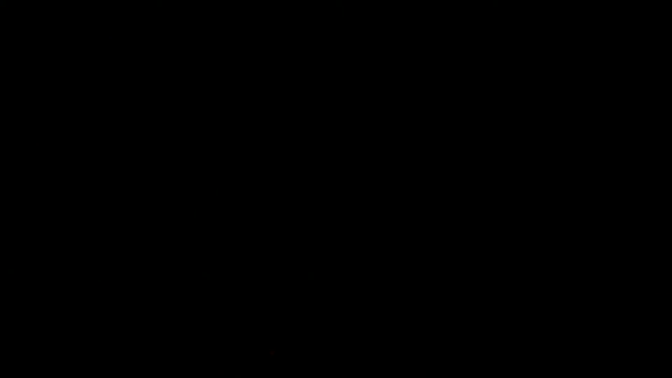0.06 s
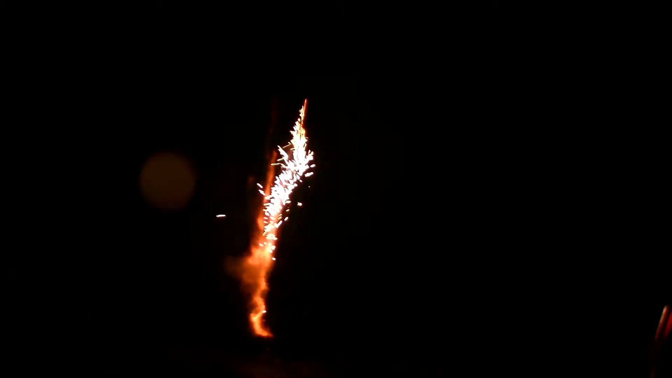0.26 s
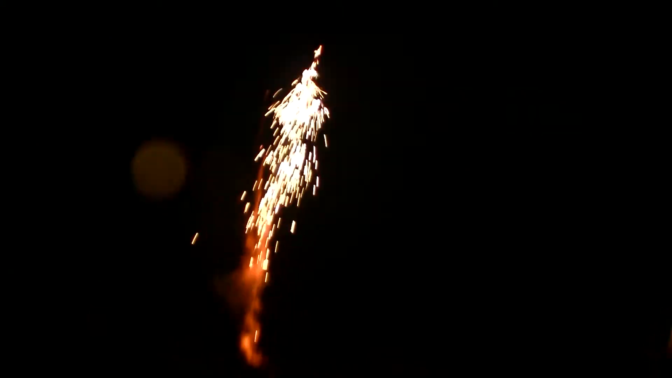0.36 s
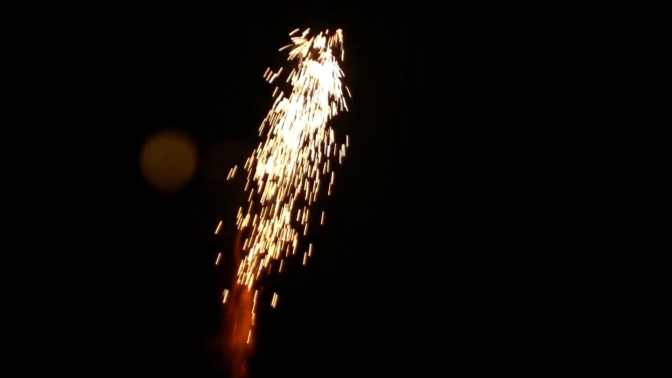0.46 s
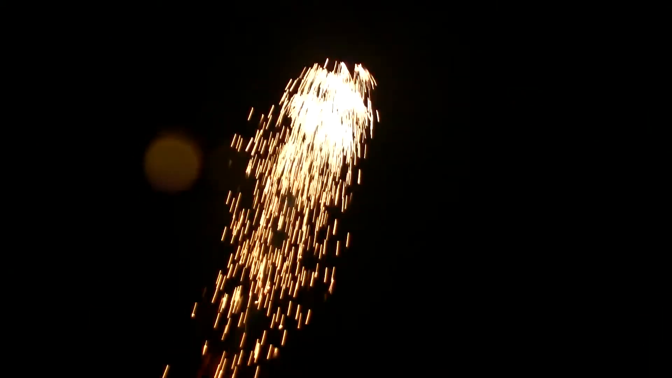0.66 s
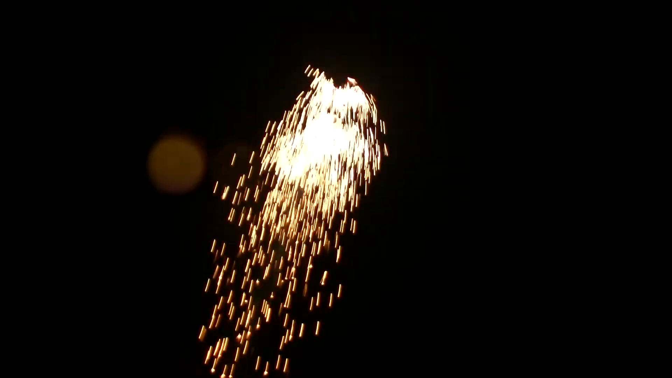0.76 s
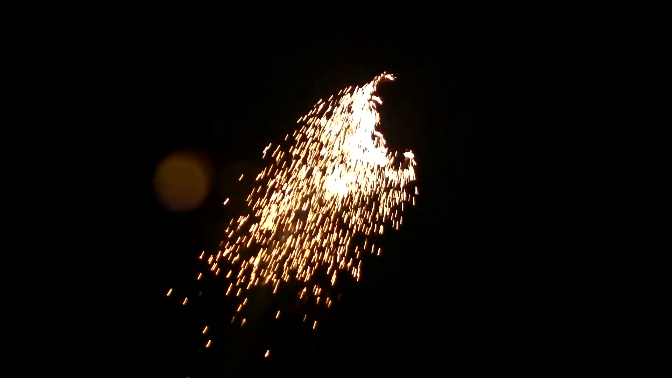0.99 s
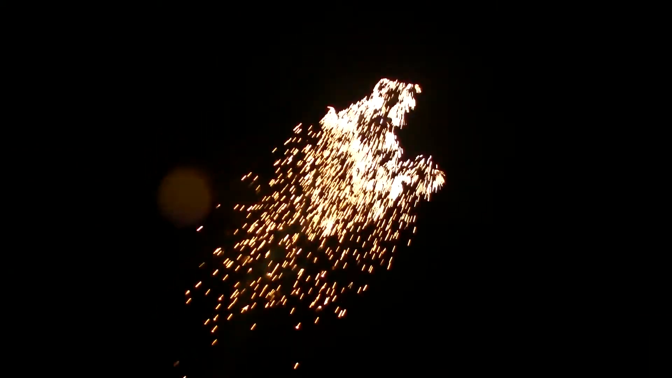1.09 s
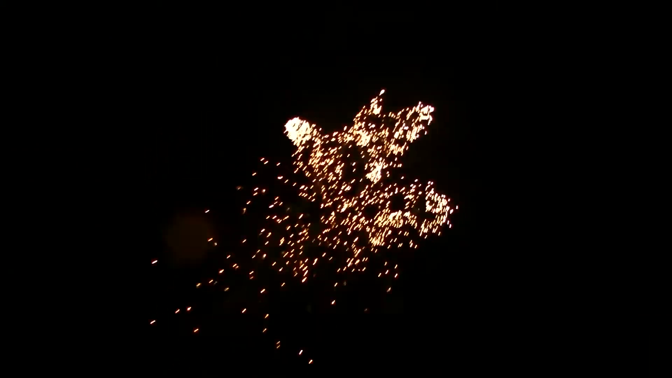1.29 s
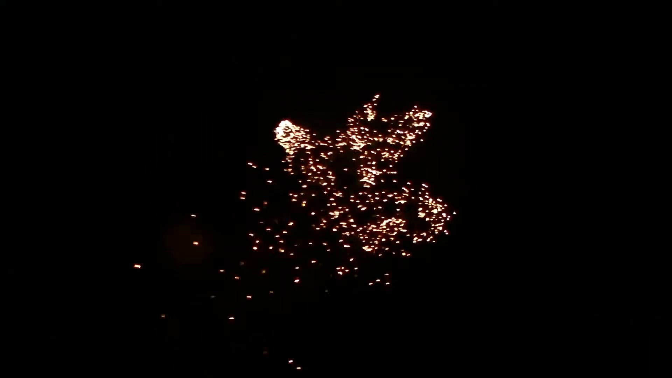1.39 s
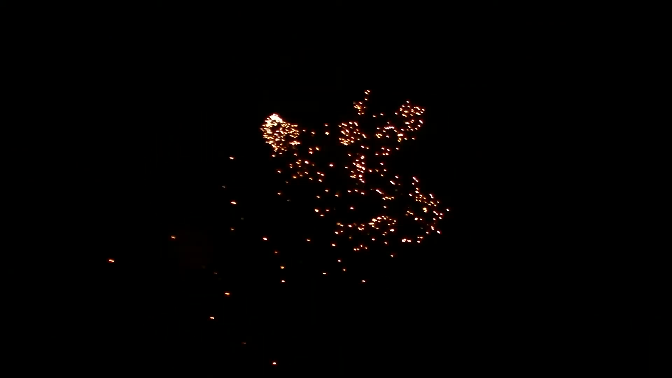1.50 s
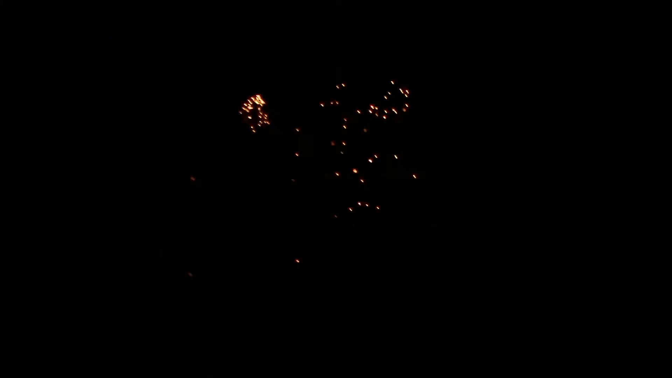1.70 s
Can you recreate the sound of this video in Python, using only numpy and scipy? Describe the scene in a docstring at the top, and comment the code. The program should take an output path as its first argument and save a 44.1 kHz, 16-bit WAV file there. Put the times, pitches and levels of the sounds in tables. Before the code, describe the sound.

A firework tube pops sharply, then three screeching whistlers fall in pitch and finally lift

```python
"""The low tail of an earlier shot dies away over faint hiss; a firework tube spits flame and pops, overloaded.
Three whistlers leave it at once: burning pipes, each a sine with overtones, falling in pitch as they burn.
At first they sputter in irregular shocks, a rasping screech whose ground echo lags more as they climb.
Their pitch lifts as they die; the rasp stops, and the last one alone goes on in a steadier tone.
Faint scattered echoes follow every sound of the new shot and the whistlers."""
import sys
import numpy as np
from scipy import signal
from scipy.fft import rfft, irfft, next_fast_len
from scipy.io import wavfile
from scipy.ndimage import uniform_filter1d, minimum_filter1d, map_coordinates

SR = 44100
rng = np.random.default_rng(int(sys.argv[2]) if len(sys.argv) > 2 else 0)


def to_wav(s):
    """Save 16-bit WAV."""
    ch = np.atleast_2d(s).T  # columns
    pcm = np.round(np.clip(ch, -1, 1) * 32767)  # PCM
    wavfile.write(sys.argv[1], SR, pcm.astype(np.int16))


N = 74970
T = np.arange(N) / SR  # s

# Spectrum of the earlier shot's low tail and the faint hiss: f/Hz, relative level/dB
TAIL_AND_HISS_SHAPE = [(25, 10), (90, 1), (250, -3.5), (450, -6.5), (900, -13.5), (2500, -15),
                       (3300, -26.5), (8000, -28.5), (16000, -38.5)]
# Loudness of that dying tail and hiss: t/s, level/dB
TAIL_AND_HISS_LEVEL = [(0, -33.5), (.03, -36.5), (.19, -34.5), (.4, -51), (1.0, -49), (1.7, -55)]

# Decay of the scattered echoes: f/Hz, t60/s
SCATTER_T60 = [(100, 0.13), (400, 0.84), (1000, 1), (2500, 0.99), (6000, 1), (14000, 0.51)]
SCATTER_DB, SCATTER_DELAY_S = -18.5, 0.025

# Resonances of the tube's boom: f/Hz, level/dB, t60/s
TUBE_MODES = [(105, -8, 0.055), (199, 0.5, 0.0378), (254, -13.5, 0.12), (397, 2.5, 0.026),
              (550, -29, 0.0083), (1210, -8, 0.041)]
# Spectrum of the flame and gas noise: f/Hz, relative level/dB
GAS_SHAPE = [(100, -28), (600, 2), (2000, 0.5), (4000, -0.5), (7000, -6.5), (11000, -25), (16000, -42)]
SPIT_S, SPIT_DB, POP_S = .2054, -14, .2101
BLAST_S, BLAST_DB = 0.0016, 9.5
CRACK_DELAY_S, CRACK_DB, CRACK_T60_S = 0.00037, 2, 0.0051
GAS_DB, GAS_T60_S = -8, 0.068

# Pitch and tone of each whistler: t/s, f/Hz, level of the fundamental before choking/dB
FIRST_WHISTLER = [(0.247, 3846, -10), (.257, 3778, -11), (.283, 3649, -16), (.315, 3529, -32),
                  (.338, 3445, -21), (0.419, 3321, -22), (.49, 3045, -32), (.57, 2823, -19),
                  (.68, 2741, -36), (.83, 2599, -21), (.92, 2411, -51), (1.049, 2313, -23),
                  (1.12, 2165, -32), (1.215, 2061, -9.5), (1.237, 2178, -29), (1.255, 2242, -17),
                  (1.31, 2152, -20), (1.36, 2255, -36), (1.39, 2464, -27), (1.415, 2574, -31.5),
                  (1.439, 2744, -42)]
SECOND_WHISTLER = [(.27, 3881, -27), (.31, 3596, -32), (0.334, 3533, -17), (.385, 3530, -22.5),
                   (.47, 3146, -23), (.62, 3058, -40), (.72, 3002, -23.5), (.92, 2483, -31),
                   (1.05, 2154, -18), (1.2, 2199, -30), (1.33, 2305, -25.5), (1.38, 2516, -29)]
LAST_WHISTLER = [(.262, 4042, -20), (.30, 3544, -18.5), (.35, 3324, -15.5), (0.431, 2954, -20.5),
                 (.55, 2817, -22.5), (0.769, 2455, -35), (.9, 2317, -29), (.98, 2044, -21.5),
                 (1.16, 1987, -22.5), (1.25, 2158, -20), (1.34, 2087, -20.5), (1.38, 1969, -28),
                 (1.42, 1917, -28), (1.45, 1961, -36.5), (1.476, 1970, -25), (1.495, 1996, -30),
                 (1.516, 2055, -25), (1.54, 2216, -33.5), (1.569, 2163, -29.5), (1.625, 2372, -31),
                 (1.663, 2700, -41), (1.681, 2540, -41.5)]
# Roughness of the burn, shared by all three: t/s, roughness (0 steady, about 1 rough)
ROUGHNESS = [(.25, 0.89), (.34, 0.79), (.45, 1.06), (.9, 1.02), (1.15, .7), (1.34, 0.59), (1.41, 0.16),
             (1.5, 0.12), (1.7, 0.11)]
# Whole overtones: multiple of the pitch, base level/dB
OVERTONES = [(2, -16), (3, -27), (4, -40), (5, -51.5)]
# Half tones, heard when every other cycle is weak: multiple of the pitch, base level/dB
HALF_TONES = [(.5, -5.5), (1.5, -8.5), (2.5, -17.5), (3.5, -32), (4.5, -36)]
# Timbre offsets: t/s, second overtone level/dB (grows with the multiple), half tone level/dB
TIMBRE = [(.25, -16, -27), (1.05, -10, -13), (1.22, 4, -0.5), (1.3, 2.5, -4.5), (1.36, -2, -11),
          (1.42, 0, 2), (1.465, 10.5, 1.5), (1.495, -11, -8.5), (1.515, 5, -10.5), (1.54, -1.5, -10),
          (1.565, 6, -14), (1.60, -2.5, -32), (1.645, -7, -49)]
# Extra half tone level of the first, second and last whistler: level/dB
HALF_TONE_LEAN = [-6.5, 1.5, 0]
PARTIAL_SWING_DB, PARTIAL_SWING_RATE = 3, 49.77  # the rate in knots/s
ROUGH_WAVER, ROUGH_WAVER_RATE = .035, 330  # pitch scatter (share) at roughness 1, knots/s
FINE_WAVER, FINE_WAVER_RATE = .006, 900  # tremble of even a steady burn: pitch scatter (share), knots/s
CHOKE_PER_ROUGHNESS, CHOKE_MAX, CHOKE_RATE = 1.72, .9, 170  # tone lost (share), its cap, knots/s

# Loudness of the rasp before its trims: t/s, body level/dB, treble level/dB
RASP_LEVEL = [(0.25, -34, -35), (0.272, -13.5, -19), (0.322, -21, -35.5), (0.35, -18, -26),
              (0.404, -12, -21.5), (0.49, -16.5, -25), (0.498, -22, -32), (0.53, -13, -24.5),
              (0.618, -18.5, -31), (0.644, -10.5, -23), (0.672, -18.5, -31.5), (0.72, -11, -25.5),
              (0.736, -14, -30.5), (0.792, -13, -26), (0.846, -11, -31.5), (0.852, -14, -31.5),
              (0.894, -12.5, -25.5), (0.96, -11.5, -32.5), (0.97, -12.5, -26), (1.172, -16.5, -37.5),
              (1.21, -17, -38), (1.234, -20, -46), (1.27, -22.5, -40), (1.276, -20.5, -50),
              (1.314, -19.5, -35), (1.336, -19, -46), (1.364, -20.5, -41), (1.385, -27, -68)]
BODY_TRIM_DB, TREBLE_TRIM_DB = -1, 2.5
# Spectra of the rasp's body, treble and low end: f/Hz, relative level/dB
RASP_BODY = [(60, -51), (150, -35), (260, -31.5), (500, -7), (1000, -2.5), (2000, -0.5), (3000, -0.5),
             (4200, -0.5), (6000, -21.5), (7500, -17.5), (11000, -59.5)]
RASP_TREBLE = [(2000, -68.5), (4500, -2.5), (6300, 2.5), (8000, -6), (10000, -14), (13000, -23),
               (16000, -32)]
RASP_THUD = [(50, -22), (120, -14), (200, -1), (330, 5), (520, -1.5), (800, -27), (2000, -46)]
# Loudness of the rasp's low end: t/s, level/dB
THUD_LEVEL = [(.27, -42), (.33, -31.5), (.40, -34), (.5, -35.5), (.65, -31.5), (.78, -32), (.95, -33.5),
              (1.1, -40), (1.3, -43.5), (1.385, -44.5)]
RASP_START_S, RASP_RISE_S, BURNOUT_DB_PER_S = 0.2543, 0.03, 177
SHOCK_CYCLES, SHOCK_CYCLES_SCATTER = 4, 1.1  # pipe cycles between shocks, before rounding
SHOCK_JITTER_CYCLES, SHOCK_SIZE_SPREAD = .3, 0.49  # further scatter at roughness 1, size spread (share)
RING_CYCLES, RING_SHARE = 0.82, 0.092  # the pipe's ring: cycles to fall to 1/e, level beside the shock
ECHO_START_S, CLIMB_S, ECHO_DELAY_S, ECHO_SHARE = .19, .41, .006, 0.24  # the lag grows towards .006 s

LOW_CUT_HZ, LIMIT, LIMIT_S = 90, 1, 0.00051
TOP_HZ, TOP_EDGE_HZ = 15900, 500  # middle and width of the treble cutoff


def amp(db):
    """Decibels to amplitude."""
    return 10 ** (np.asarray(db) / 20)


def unit(x):
    """x scaled to rms 1."""
    return x / np.sqrt(np.mean(x ** 2) + 1e-20)


def along(points, hz):
    """Reads (f/Hz, value) points on a log frequency axis."""
    f, v = np.transpose(points)
    return np.interp(np.log(hz + 1), np.log(f + 1), v)


def curves(rows):
    """One value per sample for each column after the time."""
    s, *columns = np.transpose(rows)
    return [np.interp(T, s, column) for column in columns]


def wobble(rate):
    """A smooth random curve, rate knots a second."""
    return map_coordinates(rng.standard_normal(4096), [T * rate], mode="wrap")


def coloured(x, points):
    """x through a causal, minimum-phase filter of unit energy with the given spectrum."""
    size = 4096
    magnitude = amp(along(points, np.fft.rfftfreq(size, 1 / SR)))
    cepstrum = irfft(np.log(magnitude))
    # folding the cepstrum forward makes the filter causal
    cepstrum[1:size // 2] *= 2
    cepstrum[size // 2 + 1:] = 0
    response = irfft(np.exp(rfft(cepstrum)))
    return signal.fftconvolve(x, response / np.linalg.norm(response))[:N]


def noise(points):
    """Coloured noise of rms 1."""
    return unit(coloured(rng.standard_normal(N), points))


def tail_and_hiss():
    """The dying low tail of an earlier shot over faint background hiss: one shaped noise."""
    level_db, = curves(TAIL_AND_HISS_LEVEL)
    return amp(level_db) * noise(TAIL_AND_HISS_SHAPE)


def surroundings(x):
    """Scattered echoes of the open ground: a noise tail whose decay depends on frequency."""
    hz, t, grains = signal.stft(rng.standard_normal(SR), SR, nperseg=256)
    decay = amp(-60 * t / along(SCATTER_T60, hz)[:, None])
    tail = signal.istft(grains * decay, SR, nperseg=256)[1]
    echoes = signal.fftconvolve(x, tail / np.linalg.norm(tail))[:N]
    return np.interp(T - SCATTER_DELAY_S, T, echoes)


def shot():
    """Flame spits, then the lift charge sends a blast wave, crack, tube boom and gas; the mic overloads."""
    t, fired = np.maximum(T - POP_S, 0), T >= POP_S
    spit = amp(SPIT_DB) * ((T >= SPIT_S) & ~fired)
    # the blast pressure jumps, then swings below zero before it settles
    blast = amp(BLAST_DB) * (1 - t / BLAST_S) * np.exp(-t / BLAST_S)
    boom = sum(amp(db - 60 * t / t60) * np.cos(2 * np.pi * hz * t) for hz, db, t60 in TUBE_MODES)
    onset = 1 - np.exp(-t / 0.000067)
    crack_level = amp(CRACK_DB - 60 * np.abs(t - CRACK_DELAY_S) / CRACK_T60_S)
    crack = (t > CRACK_DELAY_S) * crack_level * rng.standard_normal(N)
    puff = fired * amp(GAS_DB - 60 * t / GAS_T60_S)
    gas = (spit + puff) * noise(GAS_SHAPE)
    # both pressure terms enter with their sign flipped
    return np.clip(gas + crack - (blast + boom) * onset, -1, 1)


def ground_echo(x):
    """Adds a ground reflection, which falls behind as the source climbs."""
    climb = 1 - np.exp(-np.maximum(T - ECHO_START_S, 0) / CLIMB_S)
    return x + ECHO_SHARE * map_coordinates(x, [(T - ECHO_DELAY_S * climb) * SR])


def shocks(rows, cycles):
    """Every few cycles the burn pops, at uneven times, scattered further when rough; each rings the pipe."""
    hz, _ = curves(rows)
    rough, = curves(ROUGHNESS)
    timing, sizing, spacing = rng.standard_normal((3, 2000))
    gaps = np.maximum(np.round(SHOCK_CYCLES + SHOCK_CYCLES_SCATTER * spacing), 1)
    beat = np.cumsum(gaps)
    jitter = SHOCK_JITTER_CYCLES * np.interp(beat, cycles, rough) * timing
    at = np.searchsorted(cycles, beat + jitter)
    keep = (at > 0) & (at < N)
    at, size = at[keep], 1 + SHOCK_SIZE_SPREAD * np.tanh(sizing[keep])
    lag = np.arange(256)  # samples after the shock
    turns = hz[at, None] * lag / SR
    ring = RING_SHARE * np.cos(2 * np.pi * turns) * np.exp(-turns / RING_CYCLES)
    shape = (lag == 0) + ring
    return np.bincount((at[:, None] + lag).ravel(), (size[:, None] * shape).ravel(), N)[:N]


def rasp(train):
    """The joint rasp of the shocks in three bands, which stops as the fuel runs out."""
    train = ground_echo(train)
    body_db, treble_db = curves(RASP_LEVEL)
    thud_db, = curves(THUD_LEVEL)
    rise = np.clip((T - RASP_START_S) / RASP_RISE_S, 0, 1)
    burnout = amp(-BURNOUT_DB_PER_S * np.maximum(T - RASP_LEVEL[-1][0], 0))
    body = amp(body_db + BODY_TRIM_DB) * unit(coloured(train, RASP_BODY))
    treble = amp(treble_db + TREBLE_TRIM_DB) * unit(coloured(train, RASP_TREBLE))
    thud = amp(thud_db) * unit(coloured(train, RASP_THUD))
    return rise * burnout * (body + treble + thud)


def partial(multiple, level_db, cycles):
    """One overtone or half tone, its level swinging at random."""
    swing_db = PARTIAL_SWING_DB * np.tanh(wobble(PARTIAL_SWING_RATE))
    return amp(level_db + swing_db) * np.sin(2 * np.pi * multiple * cycles)


def pipe(rows, lean_db):
    """One whistler's cycle count and tone; a rough burn makes it waver and keeps choking it."""
    hz, level_db = curves(rows)
    rough, = np.clip(curves(ROUGHNESS), 0, 1.2)
    over_db, half_db = curves(TIMBRE)
    waver = ROUGH_WAVER * rough * wobble(ROUGH_WAVER_RATE) + FINE_WAVER * wobble(FINE_WAVER_RATE)
    cycles = np.cumsum(hz * (1 + waver)) / SR
    wave = np.sin(2 * np.pi * cycles)
    for k, db in OVERTONES:
        wave = wave + partial(k, db + over_db * k / 2, cycles)
    for k, db in HALF_TONES:
        wave = wave + partial(k, db + half_db + lean_db, cycles)
    fade_in = np.clip((T - rows[0][0]) / 0.021, 0, 1)
    fade_out = np.clip((rows[-1][0] - T) / 0.0034 + 1, 0, 1)
    choke_depth = np.clip(CHOKE_PER_ROUGHNESS * rough, 0, CHOKE_MAX)
    choke = choke_depth / (1 + np.exp(4 * wobble(CHOKE_RATE) + 2))
    # sqrt(2) makes the table level the rms of the fundamental
    return cycles, np.sqrt(2) * wave * fade_in * fade_out * amp(level_db) * (1 - choke)


def whistlers():
    """Three burning pipes: their tones, and the rasp of all their shocks together."""
    tones, train = np.zeros(N), np.zeros(N)
    for rows, lean_db in zip((FIRST_WHISTLER, SECOND_WHISTLER, LAST_WHISTLER), HALF_TONE_LEAN):
        cycles, tone = pipe(rows, lean_db)
        tones = tones + tone
        train = train + shocks(rows, cycles)
    return tones + rasp(train)


def scene():
    """Earlier tail and hiss, then the shot and whistlers with their scattered echoes, as one channel."""
    direct = shot() + whistlers()
    return (tail_and_hiss() + amp(SCATTER_DB) * surroundings(direct) + direct)[None]


def record(dry):
    """The recorder cuts deep bass, holds peaks down with a fast limiter and cuts the top of the band."""
    x = signal.sosfilt(signal.butter(2, LOW_CUT_HZ, "highpass", fs=SR, output="sos"), dry)
    width = max(int(LIMIT_S * SR), 8)  # samples
    needed_gain = LIMIT / np.maximum(np.abs(x), LIMIT)
    gain = uniform_filter1d(minimum_filter1d(needed_gain, width), width)
    size = next_fast_len(N + SR // 2)
    hz = np.fft.rfftfreq(size, 1 / SR)
    band = np.clip((TOP_HZ - hz) / TOP_EDGE_HZ + .5, 0, 1)
    return irfft(rfft(x * gain, size) * band, size)[..., :N]


dry = scene()
out = record(dry)
to_wav(out)
```